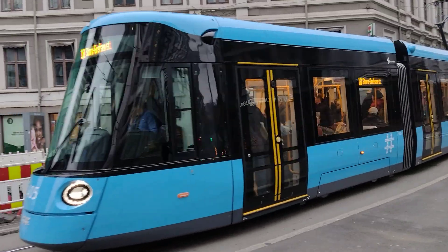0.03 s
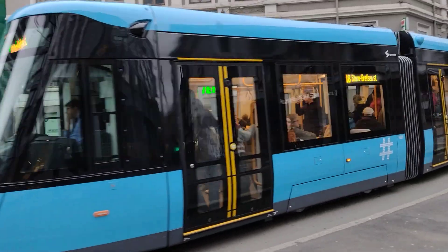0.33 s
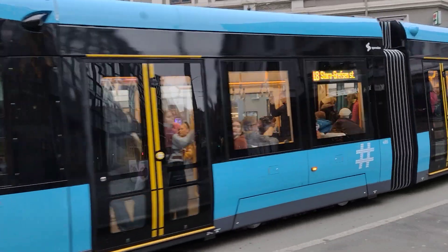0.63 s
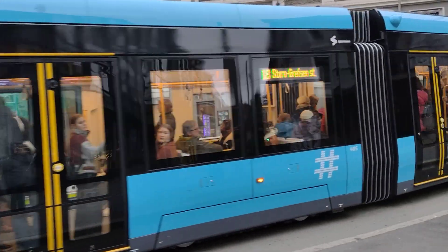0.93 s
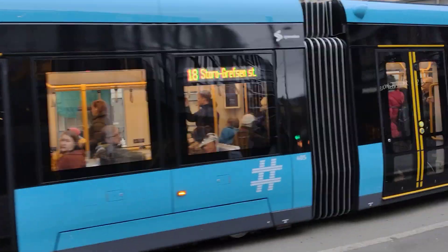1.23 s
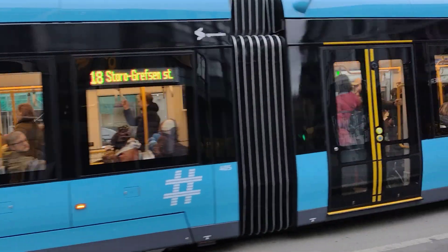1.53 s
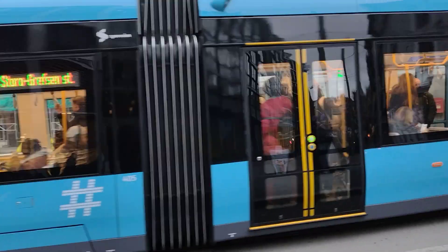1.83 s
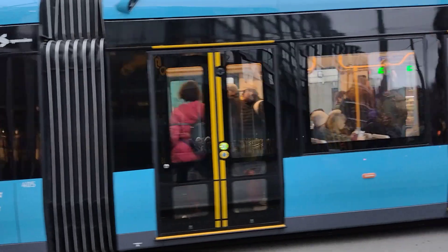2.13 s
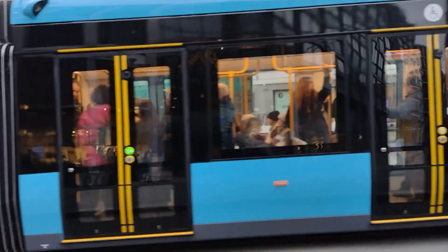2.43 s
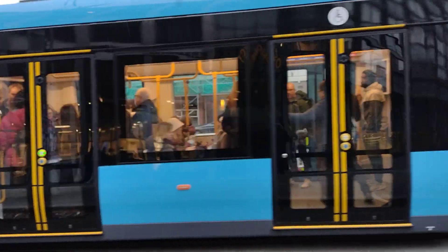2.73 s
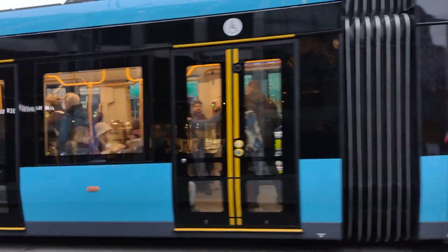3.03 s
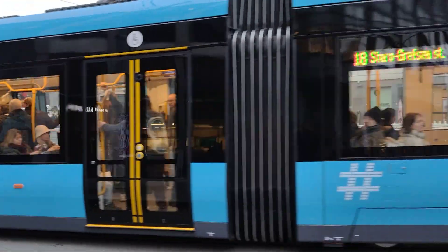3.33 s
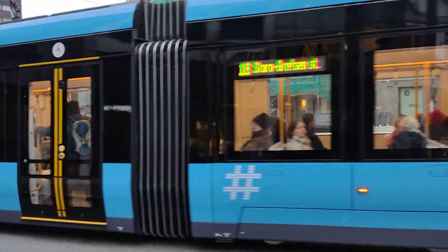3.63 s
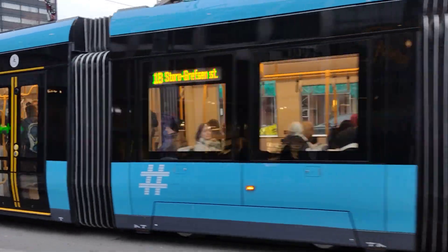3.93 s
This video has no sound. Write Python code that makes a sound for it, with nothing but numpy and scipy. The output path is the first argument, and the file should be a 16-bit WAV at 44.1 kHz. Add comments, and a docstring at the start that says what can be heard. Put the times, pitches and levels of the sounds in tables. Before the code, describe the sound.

A tram rolls past close by, its wheels squealing shrilly over a low rumble.

```python
"""On a street, a tram rolls through a curve a few metres away. Two steel wheels pass in turn, each
squealing on one high mode that sinks with the Doppler shift. Reflections from the street smear the
squeal, and early on it jumps to neighbouring modes. Flanges scrape the rail, the running gear rumbles,
thuds and whines, and the rear bogie passes with a falling whoosh. A fast limiter holds the treble down."""
import sys
import numpy as np
from scipy import signal
from scipy.fft import rfft, irfft, next_fast_len
from scipy.io import wavfile
from scipy.ndimage import uniform_filter1d, minimum_filter1d, map_coordinates

SR = 44100
rng = np.random.default_rng(int(sys.argv[2]) if len(sys.argv) > 2 else 0)


def wav_record(signal):
    """Record a signal, one row per channel, as 16-bit PCM in the file named by sys.argv[1]."""
    frames = np.transpose(np.atleast_2d(signal))
    bounded = np.clip(frames, -1, 1)
    # unit amplitude maps onto the largest positive 16-bit level
    quanta = np.round(bounded * 32767).astype(np.int16)
    wavfile.write(sys.argv[1], SR, quanta)


N = 176400
TIME = np.arange(N) / SR
TRAM_M_PER_S, SOUND_M_PER_S = 5, 343
# Each wheel: squeal pitch in Hz, time abreast of the listener in seconds, distance then in metres.
FRONT_WHEEL, REAR_WHEEL = (9718, 1.44, 3.3), (9781, 3.45, 5)


def amp(db):
    """Amplitude grows tenfold for every 20 dB."""
    return 10 ** (np.asarray(db) / 20)


def unit(x):
    """Normalisation brings the rms to 1."""
    return x / np.sqrt(np.mean(np.abs(x) ** 2) + 1e-20)


def along(points, hz):
    """Interpolation joins (Hz, value) points on a logarithmic frequency axis."""
    freqs, values = np.transpose(points)
    return np.interp(np.log(hz + 1), np.log(freqs + 1), values)


def curves(rows):
    """Linear interpolation in time gives one value a sample for each column after the first."""
    times, *columns = np.transpose(rows)
    return [np.interp(TIME, times, column) for column in columns]


def wobble(rate):
    """Smooth random modulation: a spline through rate knots a second."""
    return map_coordinates(rng.standard_normal(N // 16), [TIME * rate], mode="wrap")


def filtered(x, response):
    """Linear filtering multiplies the spectrum by response(Hz)."""
    size = next_fast_len(N + SR // 2)
    return irfft(rfft(x, size) * response(np.fft.rfftfreq(size, 1 / SR)), size)[..., :N]


def noise(gain):
    """Partly coherent stereo noise of rms 1, coloured by gain(Hz), is nearly mono at 70-280 Hz."""
    # Each row: frequency in Hz, correlation of left and right.
    coherence = [(30, 0.33), (70, 0.92), (280, 0.86), (550, 0.56), (1100, 0.19), (3000, 0), (12000, 0.43)]

    def mid_side_gain(hz):
        angle = np.arccos(along(coherence, hz)) / 2
        return gain(hz) * np.array([np.cos(angle), np.sin(angle)])

    mid, side = filtered(rng.standard_normal((2, N)), mid_side_gain)
    return unit(np.array([mid + side, mid - side]))


def resonance(centre_hz, width_hz, skirt=2):
    """A randomly driven resonance passes a narrow band of noise."""
    return noise(lambda hz: 1 / (1 + np.abs(2 * (hz - centre_hz) / width_hz) ** skirt))


def ringing(modes):
    """Modal superposition: noise passes through several resonances at once."""
    return noise(lambda f: sum(amp(db) / (1 + (2 * (f - hz) / width) ** 2) for hz, width, db in modes))


def sliding_band(hz, width_hz, skirt=2):
    """Frequency shifting makes the centre of a noise band follow hz."""
    analytic = signal.hilbert(resonance(hz.mean(), width_hz, skirt))
    return np.real(analytic * np.exp(2j * np.pi * np.cumsum(hz - hz.mean()) / SR))


def patchy(x, depth_db=5):
    """Random gain over time and frequency gives the noise a flecked, patchy texture."""
    spectra = signal.stft(x, nperseg=1024)[2]
    field = rng.standard_normal(spectra.shape[1:])
    field = uniform_filter1d(uniform_filter1d(field, 3, 0), 5, 1)
    return unit(signal.istft(spectra * amp(depth_db * unit(field)), nperseg=1024)[1][:, :N])


def phase(hz, jitter_hz=6):
    """Phase is the integral of frequency, here slightly unsteady."""
    return 2 * np.pi * np.cumsum(hz + jitter_hz * wobble(34)) / SR


def passing_tone(wheel, levels, mic_gap_m=.012, flutter_db=2.8, wander_rad=1.1):
    """A moving source's bearing sets its Doppler shift and stereo lag; reflections make it waver."""
    hz, abreast_s, distance_m = wheel
    ahead_m = TRAM_M_PER_S * (abreast_s - TIME)
    approach = ahead_m / np.hypot(ahead_m, distance_m)
    doppler_phase = phase(hz * (1 + approach * TRAM_M_PER_S / SOUND_M_PER_S))
    half_lag_rad = np.pi * hz * mic_gap_m * approach / SOUND_M_PER_S
    db, pan_db = curves(levels)
    channels = []
    for side in (1, -1):
        level = amp(db + side * pan_db / 2 + flutter_db * wobble(34))
        channels.append(level * np.sin(doppler_phase - side * half_lag_rad + wander_rad * wobble(10)))
    return np.sqrt(2) * np.array(channels)


def wheel_squeal():
    """Each wheel vibrates in a single high mode and radiates a nearly pure tone."""
    # Each row: time in seconds, squeal level in dB, left minus right in dB.
    front_levels = [(0, -14, 0), (.17, -14, 2), (.27, -23, 0), (.42, -13.5, 0), (.5, -25, -2),
                    (.79, -42, 6), (.94, -24, 6), (1.11, -24, 0), (1.135, -13.5, -3), (1.32, -12, -1),
                    (1.43, -17, -4), (1.5, -12.5, -3), (1.78, -11, -2), (1.86, -21, 0), (2.02, -21, 0),
                    (2.1, -14.5, 0), (2.36, -12.5, 0), (2.41, -23, 1), (2.73, -22, 5), (3.1, -46, 0)]
    rear_levels = [(1.79, -50, -6), (1.86, -26, -8), (2.15, -20, -6), (2.28, -27, -6), (2.48, -17, -5),
                   (3.04, -17, -11), (3.14, -12, -10), (3.42, -7.3, 0), (3.53, -11.5, 4), (3.76, -11.5, 6),
                   (3.83, -18, 0), (3.93, -14.5, -2)]
    return passing_tone(FRONT_WHEEL, front_levels) + passing_tone(REAR_WHEEL, rear_levels)


def street_echo():
    """Reflections arrive with many Doppler shifts at once and beat against the direct squeal."""
    # Each row: time in seconds, reflected level in dB.
    levels = [(0, -18), (.3, -14.5), (.6, -17.5), (.7, -27), (.8, -36), (1.08, -28), (1.2, -18),
              (1.46, -17), (1.52, -26), (1.68, -17), (2.1, -19.5), (2.9, -17), (3.42, -24), (3.55, -18.5),
              (3.85, -16), (4, -19)]
    # Each row: time in seconds, band centre in Hz, lying toward the louder wheel.
    centres = [(0, 9810), (1.2, 9780), (1.65, 9700), (2.3, 9715), (3.1, 9780), (4, 9730)]
    return amp(curves(levels)[0]) * sliding_band(curves(centres)[0], width_hz=180, skirt=1.91)


def flange_scrape(ring_db=10, grit_db=7, rough_db=2, scuff_t60_s=.08):
    """Friction on the rail makes broadband grit and excites the wheel modes; scuffs add bursts of grit."""
    # Each row: time in seconds, relative scrape level in dB, dipping briefly where the squeal is loud.
    levels = [(0, -43), (.13, -54), (.17, -45), (.32, -46), (.46, -34), (.55, -34.5), (.73, -41.5),
              (.92, -40), (1.11, -41), (1.15, -50), (1.32, -48), (1.38, -42), (1.48, -42), (1.53, -61),
              (1.59, -46), (1.635, -59), (1.68, -45), (1.74, -45), (1.785, -61), (1.85, -45), (1.89, -50),
              (2.01, -35.5), (2.11, -47), (2.2, -44), (2.27, -52), (2.4, -43), (2.5, -49), (2.8, -43.5),
              (2.95, -47), (3.42, -50), (3.7, -49), (3.85, -45.5)]
    # Each row: start in seconds, level in dB.
    scuffs = [(1.4, -36), (1.472, -35), (1.566, -31), (1.65, -38), (1.73, -37)]
    # Each row: frequency in Hz, relative spectral density in dB.
    grit_spectrum = [(1400, -1.5), (1900, 1.5), (2400, -11), (3200, -2.5), (3550, 4.5), (5800, 1),
                     (10800, 5.5), (11700, -18), (12200, -21), (16000, -30)]
    # Each row: frequency in Hz, width in Hz, relative level in dB.
    wheel_modes = [(2028, 130, -6.5), (5010, 130, -7), (6563, 146, -4), (6970, 84, -3.5), (8186, 130, 4),
                   (11334, 260, 1), (12960, 360, -8), (14400, 240, -7), (15710, 160, -6.5)]
    level = amp(curves(levels)[0] + rough_db * wobble(60))
    bursts = sum(amp(db - 60 * np.abs(TIME - start) / scuff_t60_s) * (TIME > start)
                 for start, db in scuffs)
    grit = patchy(noise(lambda hz: amp(along(grit_spectrum, hz))))
    grit = unit(grit * amp(rough_db * wobble(600)))
    ring = amp(ring_db) * level * patchy(ringing(wheel_modes))
    return ring + (amp(grit_db) * level + bursts) * grit


def swelling_noise(levels, spectrum, swell_db=2):
    """Amplitude modulation makes coloured noise swell unevenly about a level curve."""
    level = amp(curves(levels)[0] + swell_db * wobble(14))
    return level * noise(lambda hz: amp(along(spectrum, hz)))


def running_gear():
    """Body vibration and rolling radiate broad, low noise; the drive whines in one narrow band."""
    # Each row: time in seconds, level in dB.
    rumble_levels = [(0, -37), (.55, -37), (.72, -39), (1.17, -44), (1.44, -32), (1.54, -41), (1.6, -33),
                     (2.4, -40), (3.08, -39), (3.45, -44.5), (3.66, -33), (3.7, -46), (3.84, -34),
                     (3.9, -43)]
    roll_levels = [(0, -40.5), (.15, -40.5), (.53, -40), (1.15, -45.5), (1.26, -33.5), (1.33, -42),
                   (2.2, -41.5), (2.36, -39.5), (3.07, -37.5), (3.22, -46.5), (3.5, -41.5), (3.9, -36.5)]
    whine_levels = [(0, -41.5), (.36, -49), (1.1, -52.5), (1.3, -47.5), (1.48, -48), (1.6, -57.5),
                    (3.45, -57), (3.7, -50.5)]
    # Each row: frequency in Hz, relative spectral density in dB.
    rumble_spectrum = [(15, 0.5), (35, -11), (55, -2), (70, 0), (95, -1.5), (130, -7), (220, -20),
                       (500, -35.5)]
    roll_spectrum = [(60, -41), (140, -7), (220, 1.5), (290, 3.5), (370, -6.5), (600, -11), (950, -10),
                     (1400, -26), (2500, -23.5), (6000, -44)]
    rumble = swelling_noise(rumble_levels, rumble_spectrum)
    roll = swelling_noise(roll_levels, roll_spectrum)
    whine = amp(curves(whine_levels)[0]) * resonance(centre_hz=769.5, width_hz=20.5)
    return rumble + roll + whine


def struck_mode(start, hz, db, t60_s, rise_s=.012):
    """A damped mode swells quickly after a blow and decays exponentially."""
    age = np.maximum(TIME - start, 0)
    envelope = amp(db - 60 * age / t60_s) * (1 - np.exp(-age / rise_s))
    return envelope * np.sqrt(2) * np.sin(phase(hz))


def rail_knocks(ping_hz=2110):
    """Impact excitation: uneven rail thuds through the body and pings a wheel's lowest mode."""
    # Each row: start in seconds, pitch in Hz, level in dB.
    thuds = [(.19, 75, -27), (1.4, 95, -25), (1.41, 270, -33), (1.98, 300, -26), (2.11, 75, -29),
             (3.02, 75, -28)]
    # Each row: start in seconds, level in dB.
    pings = [(1.33, -43), (1.41, -42), (1.99, -38), (2.14, -44), (2.35, -44), (2.48, -45), (2.73, -44)]
    body = sum(struck_mode(start, hz, db, t60_s=.2) for start, hz, db in thuds)
    return body + sum(struck_mode(start, ping_hz, db, t60_s=.17) for start, db in pings)


def flange_bites(rise_s=.06, fall_s=.1):
    """A biting flange makes the front wheel's upper modes flare; changing delay Doppler shifts them."""
    # Each row: time of the peak in seconds, level in dB.
    bites = [(.2, -31), (1.09, -23), (1.41, -28), (1.48, -29), (1.58, -36), (1.85, -33), (1.945, -25),
             (2.01, -21), (2.42, -29), (2.8, -29), (3.03, -36)]
    # Each row: frequency in Hz, width in Hz, relative level in dB.
    upper_modes = [(6395, 80, 1.5), (8120, 170, -1), (11290, 190, 1), (12560, 190, -7), (14500, 220, -12),
                   (16340, 290, -1)]
    level = sum(amp(db - 20 * np.maximum((peak_s - TIME) / rise_s, (TIME - peak_s) / fall_s))
                for peak_s, db in bites)
    _, abreast_s, distance_m = FRONT_WHEEL
    emitted_s = TIME - np.hypot(TRAM_M_PER_S * (TIME - abreast_s), distance_m) / SOUND_M_PER_S
    return level * np.array([map_coordinates(channel, [emitted_s * SR], order=5, mode="mirror")
                             for channel in ringing(upper_modes)])


def mode_jumps(fade_db=36.5, smear_width_hz=98):
    """Mode hopping: other wheel modes sing briefly, each a tone inside its smeared reflections."""
    # Each row: start and end in seconds, pitch in Hz, level in dB, rise and fall in seconds
    # (each spanning fade_db), reflected share of the power.
    jumps = [(.5, .56, 6588, -21, .09, .33, .4), (.45, .68, 8195, -25, .1, .1, .8),
             (.69, 1.09, 8198, -17, .12, .05, .3), (.73, .92, 11322, -19, .4, .45, .45),
             (.44, 1.1, 2058, -42, .05, .1, .95), (.6, 1.0, 5088, -42, .3, .3, .8),
             (3.49, 3.53, 6525, -39, .1, .5, .5)]
    quadrature = np.array([[0], [np.pi / 2]])  # left and right a quarter cycle apart
    out = np.zeros((2, N))
    for start, end, hz, db, rise, fall, share in jumps:
        fade = np.maximum(start - TIME, 0) / rise + np.maximum(TIME - end, 0) / fall
        tone = np.sqrt(2) * np.sin(phase(hz) + quadrature)
        smear = resonance(hz, smear_width_hz)
        out += amp(db - fade_db * fade) * (np.sqrt(1 - share) * tone + np.sqrt(share) * smear)
    return out


def bogie_whoosh():
    """Narrower noise sounds more tonal: a band sinks and tightens to a whistle as the rear bogie passes."""
    # Each row: time in seconds, centre in Hz, whoosh level in dB, whistle level in dB.
    glide = [(3.02, 1170, -60, -70), (3.13, 1100, -42.5, -56), (3.3, 1010, -43.5, -55),
             (3.49, 915, -46, -44), (3.54, 840, -46, -58), (4, 690, -54, -70)]
    hz, whoosh_db, whistle_db = curves(glide)
    whoosh = amp(whoosh_db) * sliding_band(hz, width_hz=160)
    return whoosh + amp(whistle_db) * sliding_band(hz, width_hz=22)


def scene():
    """Superposition: the pressures from all the tram's sources add."""
    sustained = wheel_squeal() + street_echo() + flange_scrape() + running_gear()
    return sustained + rail_knocks() + flange_bites() + mode_jumps() + bogie_whoosh()


def record(dry, crossover_hz=4400, ceiling=.87, hold_s=.0061, top_hz=15800):
    """Split-band limiting turns down treble peaks in each channel; a low-pass then cuts at top_hz."""
    bass = filtered(dry, lambda hz: 1 / (1 + (hz / crossover_hz) ** 4))
    treble = dry - bass
    hold = int(hold_s * SR)
    needed_gain = ceiling / np.maximum(np.abs(treble), ceiling)
    gain = uniform_filter1d(minimum_filter1d(needed_gain, hold), hold)
    return filtered(bass + gain * treble, lambda hz: hz < top_hz)


dry = scene()
out = record(dry)
wav_record(out)
```